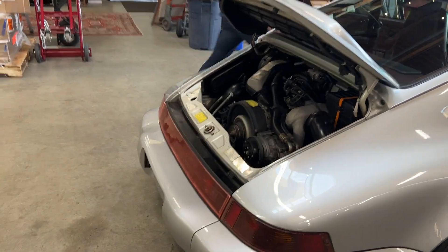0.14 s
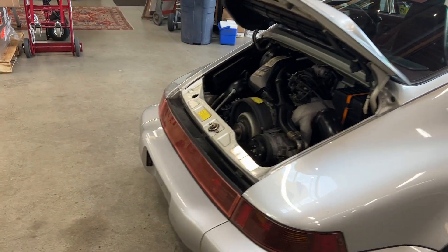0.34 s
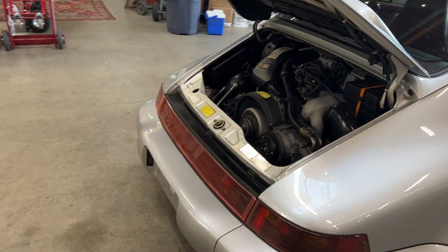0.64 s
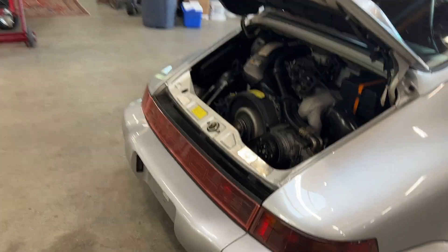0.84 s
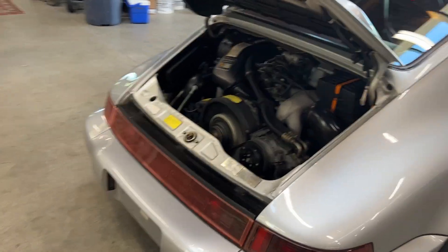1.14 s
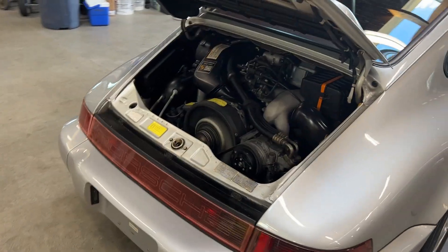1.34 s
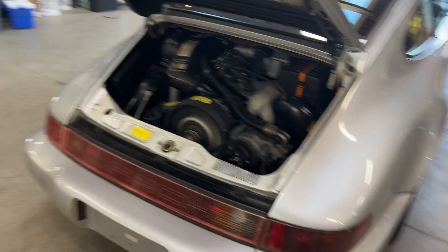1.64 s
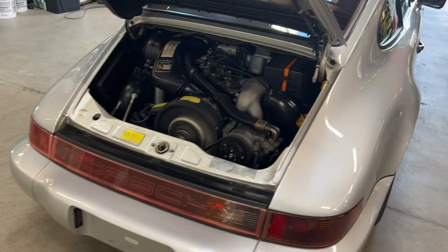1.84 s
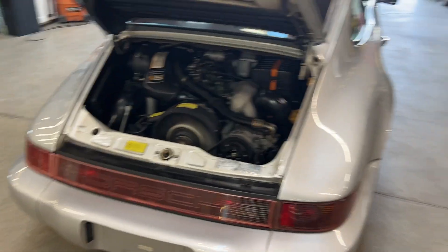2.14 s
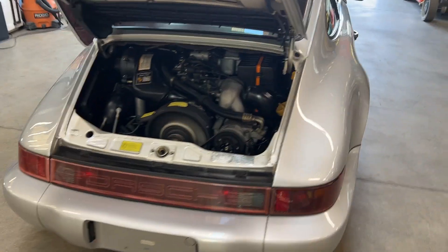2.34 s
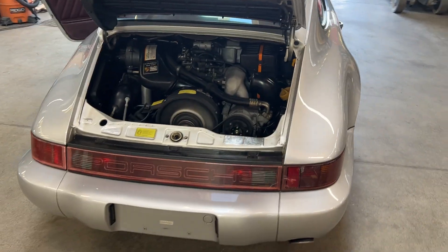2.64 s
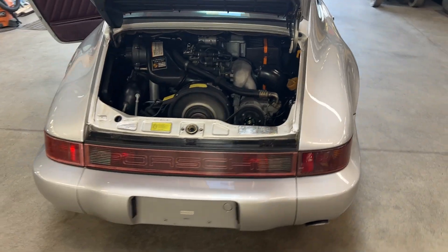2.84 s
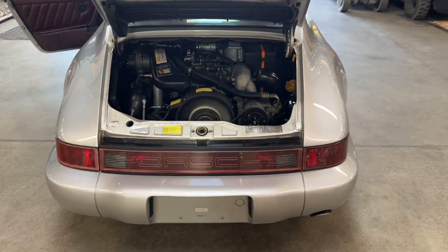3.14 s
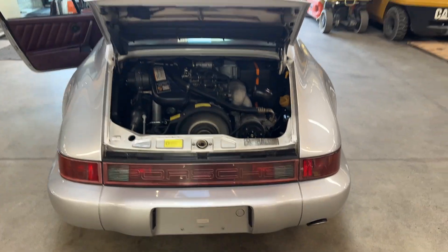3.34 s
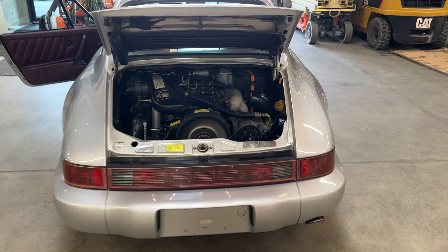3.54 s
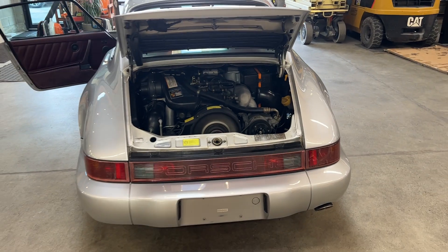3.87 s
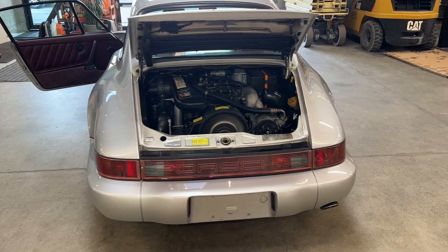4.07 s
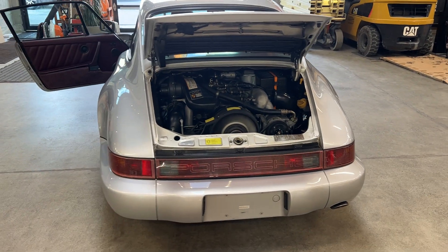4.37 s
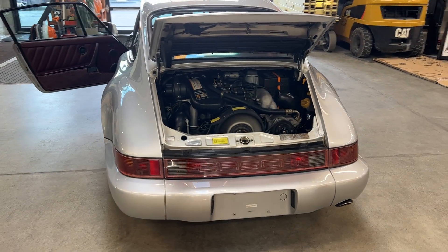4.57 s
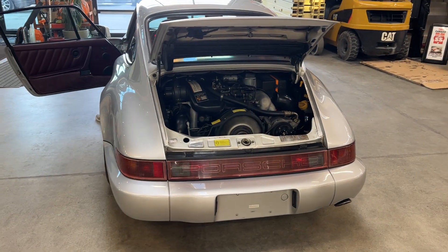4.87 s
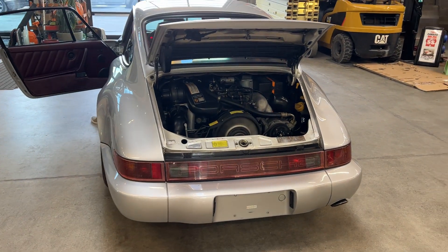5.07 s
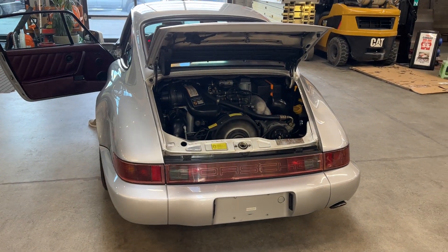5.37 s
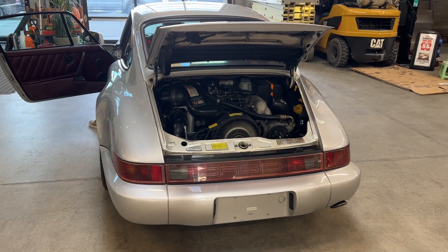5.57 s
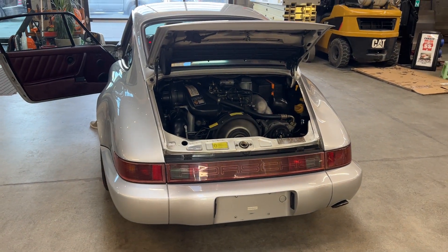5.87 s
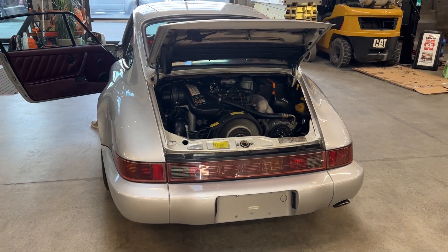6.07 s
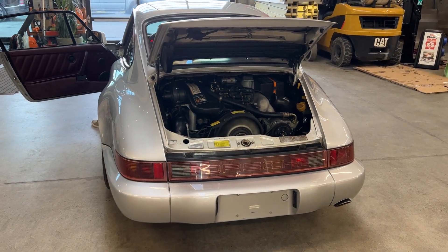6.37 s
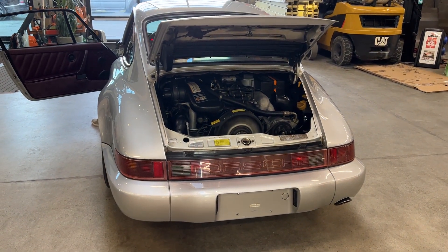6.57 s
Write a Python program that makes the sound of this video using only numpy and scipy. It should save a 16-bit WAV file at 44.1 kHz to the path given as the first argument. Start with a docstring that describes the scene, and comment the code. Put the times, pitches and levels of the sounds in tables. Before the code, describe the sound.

From 0 s an air-cooled six-cylinder engine is already idling at roughly 940 turns a minute, heard close in stereo with the lid open in a large workshop. Fast exhaust puffs, about 47 a second, fuse into a deep, uneven throb around 50-115 Hz with a hollow bark above. Cooling-fan roar and bright hiss cover it, leaning left especially around 0.7-1.5 s, with a light valve tick about eight times a second. A breathy whistle near 1.2 kHz wavers. Rough high whine swells around 1-2 s; small belt chirps flicker throughout. Near 2-3 s the exhaust faces the listener more directly and intake rush strengthens. From 3.7 s the deep boom recedes as the listener backs away. Between 4 and 6.4 s weak firings make the idle lumpier and the whistle sag repeatedly; squeaky chirps recur. It continues idling to the end at 6.7 s.

```python
"""The boom of exhaust puffs comes first, some of them weak: an air-cooled six-cylinder boxer engine idles in a
large workshop, its lid open, and the listener walks round the tail and backs off. Each puff strikes resonant
modes of the exhaust and silencer. Around them the cooling fan roars and hisses as shaped noise, one valve ticks
as a treble flare once a cycle, the intake whistles as a tone that sags in pitch over rushing noise,
and the belt drive chirps and whines as tones roughened by narrow noise."""
import sys
import numpy as np
from scipy import signal
from scipy.fft import rfft, irfft, next_fast_len
from scipy.io import wavfile

SR = 44100
rng = np.random.default_rng(int(sys.argv[2]) if len(sys.argv) > 2 else 0)


def volts(x):
    """Linear amplitude factor 10**(x/20) for a level x in dB, scalar or array-like."""
    e = np.asarray(x, float) / 20
    return 10 ** e


def store_wav(level_fs):
    """Save 16-bit WAV to argv[1]."""
    pcm = np.round(np.clip(np.atleast_2d(level_fs), -1, 1) * 32767)
    wavfile.write(sys.argv[1], SR, pcm.T.astype(np.int16))


N = 295894

# The idle hunts a little about a steady speed: start_s, crank_ahead_turns
CRANK_HUNTING = [(0, .112), (.5, .184), (.8, .198), (1.4, .343), (2, .294), (2.3, .252), (2.6, .172),
                 (3.2, .18), (3.5, .131), (3.8, .177), (4.7, .203), (5, .174), (5.6, .225), (6.2, .219),
                 (6.71, .141)]
# Cylinders in firing order, banks in turn: exhaust_opens_late_deg, puff_db
CYLINDERS = [(25.3, 5.8), (28.5, 0.2), (27.0, 1.0), (27.0, 6.1), (27.8, 6.1), (23.8, 1.5)]
# Firings that lose pressure: start_s, puff_lost_share, whistle_sag_hz
WEAK_FIRINGS = [(.438, 0.21, 31), (.544, 0.054, 24.5), (.65, 0.58, 29), (.863, 0.44, 20), (1.326, .05, 35),
                (1.582, .22, 80), (1.839, .24, 77), (2.07, .05, 50), (2.313, .16, 90), (2.465, .4, 18),
                (2.724, 0.43, 28), (3.215, 0.66, 30), (3.258, 0.19, 10), (3.75, .2, 10), (3.856, 0.39, 42),
                (3.92, 0.054, 75), (4.005, 0.5, 10), (4.261, 0.52, 127), (4.517, 0.56, 122),
                (4.645, .3, 10), (4.731, .55, 134), (4.795, .33, 30), (4.881, .35, 5), (4.903, .95, 65),
                (4.99, .05, 85), (5.137, 0.25, 30.3), (5.286, .95, 125), (5.478, .35, 39), (5.52, .44, 60),
                (5.563, .05, 60), (5.777, 0.47, 59), (5.798, 0.71, 79), (5.905, 0.35, 10),
                (6.033, 0.42, 40), (6.055, 0.74, 88), (6.161, .23, 5), (6.29, 0.051, 49), (6.441, .3, 10)]
# Exhaust and silencer modes, pushes signed: mode_hz, t60_s, first_bank_push, second_bank_push, thud_push
EXHAUST_MODES = [(50.59, 0.1, 2.85, 2.64, 2.09), (66.5, 0.25, -1.87, -1.86, 1.03),
                 (81.61, 0.12, -1.34, 1.71, 0.16), (101.04, 0.25, -0.48, -0.49, -0.83),
                 (112.19, 0.25, -1.04, -2.14, 0.54), (114.41, 0.25, 1.49, 2.29, -0.97),
                 (161.47, 0.17, -0.17, -0.56, -0.67), (174.84, 0.17, -0.74, 1.83, 0.82),
                 (178.65, 0.18, 0.92, -1.54, -0.34), (245.61, 0.19, 0.12, 0.01, 0.0)]
# Walking round and away: start_s, boom_level_db, facing_tailpipe_gain_db
NEARNESS = [(0, -12.5, -3), (.8, -12, -1), (1.4, -11.5, -.5), (2, -12.5, 3.5), (3.1, -13.5, 2),
            (3.7, -14, -.5), (4.3, -16, 1), (5.3, -16, -1.5), (6, -15.5, 0.5), (6.71, -17, 1.5)]

# Spectrum of the fan noise, relative: frequency_hz, density_db_per_hz
FAN_SPECTRUM = [(110, -17.5), (165, -14), (205, -11), (300, -15.5), (549, -27.5), (750, -24.5), (1000, -26),
                (1220, -22.5), (2000, -26.5), (3130, -32), (4070, -31.5), (5500, -33), (8030, -31.5),
                (10000, -39), (13000, -33.5), (15700, -39.5)]
# Likeness of the fan noise at left and right: frequency_hz, shared_share
FAN_LIKENESS = [(60, 0.9), (300, 0.95), (700, 0.57), (1200, 0.58), (2000, 0.56), (2700, 0.7), (3300, 0.35),
                (4200, 0.97), (5500, 0.05), (6500, 0.34), (8000, 0.46), (10000, 0.9), (15700, 0.9)]
# Centres that divide the fan noise into the roar (first) and five hiss bands: centre_hz
FAN_BANDS_HZ = [1000, 3000, 4500, 6000, 8000, 13000]
# Reference levels of the roar and the hiss bands: level_db
FAN_REFERENCE_DB = [-41, -43, -42.5, -44.5, -44, -47]
# Resting levels of the five hiss bands: level_db
HISS_REST_DB = [-42.5, -43.5, -44, -46.5, -49]
# The beamed hiss turns colour with the listener: centre_s, half_length_s, band_index (rounded), gain_db
COLOUR_TURNS = [(1.3, .8, 0, 2), (1.27, 0.35, 1.5, 1), (1.95, 0.55, 1, 3.5), (.8, .3, 1, 2),
                (3.2, .6, 2, 1.5), (.67, .35, 3, -4.5), (2.3, 1, 3, 3.5), (1.5, 1.2, 4.5, 1.7)]
# Side-to-side balance of the hiss near 6 kHz: start_s, left_over_right_db
HISS_BALANCE = [(0, 5), (.67, 12.5), (1.3, 12), (1.9, 5.5), (3.9, 4), (6.71, 2.5)]
# Reflections from floor, lid and engine bay: delay_ms
ECHOES_MS = [1.696, 2.9, 4.6, 7.3]

# Whistle pitch between sags: start_s, pitch_hz
WHISTLE_PITCH = [(0, 1228), (1.3, 1232), (1.6, 1261), (2.5, 1265), (3.8, 1268), (4.1, 1299), (6.14, 1300),
                 (6.2, 1215), (6.5, 1198), (6.71, 1195)]
# Air through the intake box, between dips: start_s, level_db
INTAKE_RUSH = [(0, -40.5), (1.3, -37), (3.1, -34.5), (3.85, -36), (4.3, -38.5), (5.2, -40), (6.71, -42)]

# Belt drive, alternator and fan bearing: pitch_hz, resting_db, roughness_ratio, width_hz, likeness_share
BELT_TONES = [(2152, -57.5, 1.1, 24, 0.38), (2690, -57, .6, 45, 0.3), (3380, -59, 4.8, 65, 0.57),
              (4026, -52, 4.8, 64, .6), (4435, -58, 4.8, 71, 0.54)]
# A belt-drive tone speaks up: centre_s, half_length_s, tone_index (rounded), gain_db
TONE_SWELLS = [(.58, .04, 1, 10), (.75, .03, 0, 13), (3.15, .6, 0.5, 4), (6.3, .5, 0, 3), (4.2, .8, 1, 4),
               (2.9, .1, 0, 11), (3.15, .1, 0, 7), (3.5, .18, 0, 8.5), (3.96, 0.028, 0, 11),
               (4.13, .1, 0, 14), (4.62, .05, 0, 14), (4.98, .08, -0.5, 11), (5.16, .04, 0, 17),
               (5.32, .03, 0.5, 15), (5.94, 0.051, 0, 18.5), (6.2, .06, 0, 18.5), (6.39, .04, 0, 7),
               (6.6, .07, 0, 17), (.27, .1, 1, 7), (1.0, .15, 1, 6), (1.74, .03, 1, 11),
               (2.04, .12, 1.5, 14), (2.43, .03, 1, 16), (2.68, .06, 1, 9), (3.39, .04, 1.5, 10),
               (3.66, 0.067, 1, 15), (3.83, 0.053, 1, 16.5), (3.97, .03, 1, 8), (4.14, .08, 1, 16),
               (4.31, 0.027, 1, 7), (4.44, 0.031, 1, 14), (4.62, .1, 1.5, 14), (4.88, 0.032, 1, 12),
               (4.96, .03, 1, 8), (5.09, 0.032, 1.5, 9), (5.97, 0.049, 1.5, 8), (6.49, .03, 0.5, 10),
               (.95, 0.39, 2, 11), (2.4, .15, 1.5, 7), (2.85, .15, 2.5, 8), (3.9, .5, 1.5, 7),
               (6.3, .5, 2.5, 4), (.15, .12, 3.5, 5), (1.25, .25, 3, 10), (2.15, .25, 3, 7),
               (5.1, .4, 3, 4), (2.85, .2, 3, 7), (1.4, .5, 3.5, 13), (4.6, .6, 4, 2)]

# Level difference between the two ports: frequency_hz, left_over_right_db
PORT_TILT = [(45, .4), (110, -.5), (380, -1), (1200, 0), (2700, -1.5), (4000, 4), (6500, 0), (8200, 3),
             (9200, 0)]
# Phase difference between the two ports: frequency_hz, left_lead_rad
PORT_LEAD = [(0, 0), (1500, .1), (2200, 1), (3800, 1), (5000, .5), (7000, .5), (8000, -.8), (9500, -3.1),
             (11000, -4), (13500, -6.3), (15700, -8.6)]

IDLE_TURNS_PER_S = 15.6
# Shares of a loss felt in the firing before and after, and made up one cycle later
LOSS_BEFORE, LOSS_AFTER, REBOUND = 0.27, 0.17, 0.26
THROB_DB, RASP_DB = -24.5, -30.3  # beamed middle and upper parts of the exhaust, before the facing gain
BARK_HZ, BARK_T60_S, BARK_DB = 243, 0.1, -36.5
BARK_SPREAD_DB, BARK_JITTER_S = 1.5, 0.0005
ROAR_DB, ROAR_FOLLOWS, BARK_FOLLOWS = -39.5, 0.13, 0.6  # shares of the boom's level changes, in dB
WHISTLE_DB, CLEAR_HZ, LOWEST_HZ = -38.5, 1205, 1165  # at full level up to CLEAR_HZ
FADE_DB_PER_HZ, RUSH_DIP_DB_PER_HZ = 0.13, 0.03  # whistle above CLEAR_HZ; rush per Hz of sag
SAG_LATE_S, SAG_HALF_S = 0.0149, 0.068
TONE_FLICKER_DB = 1.2


def rms_one(x):
    """Normalization: scales a signal to unit effective value."""
    return x / np.sqrt(np.mean(x ** 2) + 1e-20)


def in_time(rows):
    """Linear interpolation: each column after the first becomes a curve over time."""
    s, *columns = np.transpose(rows)
    return [np.interp(np.arange(N) / SR, s, column) for column in columns]


def at_hz(points, hz):
    """Interpolation on a logarithmic frequency axis."""
    knots, values = np.transpose(points)
    return np.interp(np.log(hz + 1), np.log(knots + 1), values)


def bump(s, half_s):
    """Gaussian envelope: a smooth swell of height 1."""
    return np.exp(-((np.arange(N) / SR - s) / half_s) ** 2)


def swells(rows, which):
    """Superposition in dB of the swells of one tone or band; an index halfway rounds to even."""
    return sum(db * bump(s, half_s) for s, half_s, k, db in rows if round(k) == which)


def drift(rate_hz):
    """Low-passed noise: slow chance variation of unit spread."""
    r = np.exp(-2 * np.pi * rate_hz / SR)
    noise = rng.standard_normal(N + SR)
    return rms_one(signal.lfilter([1], [1, -2 * r, r * r], noise)[SR:])


def ring(clicks, hz, t60):
    """Damped resonance: a unit click sets a decaying sine of height 1 ringing."""
    r, w = volts(-60 / (t60 * SR)), 2 * np.pi * hz / SR
    return signal.lfilter([0, np.sin(w)], [1, -2 * r * np.cos(w), r * r], clicks + 1e-18)


def wavering(hz, rough, width_hz):
    """Quadrature modulation: a tone with narrow noise around it."""
    phase = 2 * np.pi * np.cumsum(hz + np.zeros(N)) / SR
    noise = drift(width_hz) * np.sin(phase) + drift(width_hz) * np.cos(phase)
    return rms_one(np.sin(phase) + rough * noise)


def spread(make, alike):
    """Partial coherence: a shared sound plus a part each port hears alone (reflections off the walls)."""
    alike = np.clip(alike, 0, 1)
    return np.sqrt(alike) * make() + np.sqrt(1 - alike) * np.array([make(), make()])


def firing_times():
    """Crank kinematics: the crank's turns at known times, begun a second early so that modes already ring."""
    when, ahead = np.transpose(CRANK_HUNTING)
    turns = IDLE_TURNS_PER_S * when + ahead
    return np.r_[0, when + 1], np.r_[turns[0] - 15.74, turns] + 14


def puff_strengths(firing, when, turns):
    """Combustion variability: chance spread, with weak firings that also affect their neighbours."""
    strength = 1 + 0.083 * rng.standard_normal(len(firing))
    shares = np.array([LOSS_BEFORE, 1, LOSS_AFTER, -REBOUND])
    for s, loss, _ in WEAK_FIRINGS:
        k = int(round(3 * np.interp(s + 1, when, turns)))
        strength[[k - 1, k, k + 1, k + 6]] *= np.clip(1 - loss * shares, 0, 2)
    return strength


def exhaust_bark(puffs, at):
    """Coupled resonance: two equal resonators in series ring up after each puff of the first bank."""
    spread_db, jitter = rng.standard_normal((2, len(at)))
    barks = np.zeros(N + 2 * SR)
    late = (SR * BARK_JITTER_S * jitter).astype(int)
    barks[at + late] = puffs[at] ** 2 * volts(BARK_SPREAD_DB * spread_db)
    once = ring(barks[:N + SR], BARK_HZ, BARK_T60_S)
    return ring(once, BARK_HZ, BARK_T60_S)[SR:]


def exhaust(levels_db):
    """Modal excitation: puffs of each bank and one thud a cycle drive the silencer modes; the tailpipe barks."""
    when, turns = firing_times()
    firing = np.arange(int(3 * turns[-1]))  # three firings a turn
    strength = puff_strengths(firing, when, turns)
    late_deg, puff_db = np.transpose(CYLINDERS)[:, firing % 6]
    at = (SR * np.interp(firing / 3 + late_deg / 360, turns, when)).astype(int)
    thud_at = (SR * np.interp(firing[::6] / 3 + 472.6 / 360, turns, when)).astype(int)
    pushes = np.zeros((3, N + 2 * SR))  # first bank, second bank, thud
    pushes[firing % 2, at] = strength * volts(puff_db)
    pushes[2, thud_at] = 1
    boom = sum(ring(np.dot(push, pushes[:, :N + SR]), hz, t60) for hz, t60, *push in EXHAUST_MODES)
    # Little is heard below this corner
    boom = signal.sosfilt(signal.butter(4, 43.6, "high", fs=SR, output="sos"), boom)[SR:]
    size = next_fast_len(N)
    spectrum = rfft(boom, size)
    deep, lower = [irfft(spectrum[:round(hz * size / SR)], size)[:N] for hz in (88, 130)]
    bark = exhaust_bark(pushes[0], at[::2])
    parts = deep, lower - deep, boom - lower, bark  # the deep near field fades first with distance
    return sum(volts(db) * rms_one(part) for db, part in zip(levels_db, parts))


def once_a_cycle(turns, place, sharp):
    """Periodic pulse: a bump up to 1 at one place (0-1) of the two-turn cycle."""
    return np.exp(sharp * (np.cos(2 * np.pi * (turns / 2 - place)) - 1))


def add_reflections(pair):
    """Comb filtering: drifting short echoes of the treble put narrow streaks in the hiss."""
    lags = [(ms + 0.05 * drift(0.3)) * SR / 1000 for ms in ECHOES_MS]
    n = np.arange(N)
    echo = [sum(np.interp(n - lag, n, side) for lag in lags) for side in pair]
    # Only the treble is mirrored
    echo = signal.sosfilt(signal.butter(2, 2500, "high", fs=SR, output="sos"), echo)
    return pair + 0.2 * echo


def fan(turns, roar_db):
    """Turbulence noise in bands: the treble throbs with the firings and flares when the loose valve shuts."""
    size = next_fast_len(N)
    hz = np.arange(size // 2 + 1) * SR / size
    shared, left, right = rfft(rng.standard_normal((3, size))) * volts(at_hz(FAN_SPECTRUM, hz))
    alike = np.clip(at_hz(FAN_LIKENESS, hz), 0, 1)
    pair = np.sqrt(alike) * shared + np.sqrt(1 - alike) * np.array([left, right])
    firing_db = 0.59 * np.cos(2 * np.pi * (3 * turns - 0.3))
    valve_db = 2.0 * once_a_cycle(turns, 0.786, 30)
    throb_db = firing_db + valve_db + 0.15 * drift(21)
    throb_share = [0.07, 0.4, 0.028, 1, 1, 1]
    hiss_db = [db + swells(COLOUR_TURNS, k) for k, db in enumerate(HISS_REST_DB)]
    balance_db = in_time(HISS_BALANCE)[0] * [[0.5], [-0.5]]
    out = 0
    for k, level_db in enumerate([roar_db] + hiss_db):
        band = np.interp(np.log(hz + 1), np.log(FAN_BANDS_HZ), np.arange(6) == k)
        swing_db = level_db - FAN_REFERENCE_DB[k] + throb_share[k] * throb_db + 0.73 * drift(7.8)
        gain = volts(swing_db + (k == 3) * balance_db)  # only the 6 kHz band leans to a side
        out = out + gain * irfft(pair * band, size)[:, :N]
    # The level is set against the shared noise between 400 and 1000 Hz
    reference = np.std(irfft(shared * (hz > 400) * (hz < 1000), size))
    return volts(-41.5) * add_reflections(out) / reference


def intake():
    """Flow tone and resonant noise: the idle-air whistle sags and clears after weak firings as the rush dips."""
    sag_hz = sum(hz * bump(s + SAG_LATE_S, SAG_HALF_S) for s, _, hz in WEAK_FIRINGS)
    # Sags flatten out softly near the lowest pitch
    above_hz = in_time(WHISTLE_PITCH)[0] - sag_hz - LOWEST_HZ
    hz = LOWEST_HZ + 15 * np.logaddexp(0, above_hz / 15) + 6 * drift(9.03)
    # The whistle thins into the rush as it rises
    whistle_db = WHISTLE_DB - FADE_DB_PER_HZ * np.maximum(hz - CLEAR_HZ, 0)
    whistle = volts(whistle_db) * spread(lambda: wavering(hz, 0.66, 41), 0.67)
    rush_db = in_time(INTAKE_RUSH)[0] - RUSH_DIP_DB_PER_HZ * sag_hz
    rush = spread(lambda: rms_one(ring(rng.standard_normal(N), 1350, 0.015)), 0.79)
    return whistle + volts(rush_db) * rush


def belt_drive(turns):
    """Friction tones: two chirps pulse with the fan pulley beside three rough whines; belt slip sways all."""
    pulse_db = 3.6 * np.cos(2 * np.pi * (1.5 * turns - 0.3))
    slip = 1 + 0.0012 * drift(4)
    out = 0
    for k, (hz, db, rough, width_hz, alike) in enumerate(BELT_TONES):
        level_db = db + swells(TONE_SWELLS, k)
        if k < 2:
            level_db = level_db + pulse_db + TONE_FLICKER_DB * drift(6.8)
        out = out + volts(level_db) * spread(lambda: wavering(hz * slip, rough, width_hz), alike)
    return out


def scene():
    """Superposition: the exhaust reaches both sides alike, and the other sources are added to it."""
    turns = IDLE_TURNS_PER_S * np.arange(N) / SR + in_time(CRANK_HUNTING)[0]
    boom_db, facing_db = in_time(NEARNESS)
    boom_change_db = boom_db - boom_db.mean()
    bark_db = BARK_DB + BARK_FOLLOWS * boom_change_db
    roar_db = ROAR_DB + ROAR_FOLLOWS * boom_change_db
    puffs = exhaust([boom_db, THROB_DB + facing_db, RASP_DB + facing_db, bark_db])
    return puffs + fan(turns, roar_db) + intake() + belt_drive(turns)


def ports(x):
    """Interaural difference: two microphone ports hear a near source with their own tilt and lead."""
    size = next_fast_len(N)
    hz = np.arange(size // 2 + 1) * SR / size
    half = volts(at_hz(PORT_TILT, hz) / 2) * np.exp(0.5j * at_hz(PORT_LEAD, hz))
    return irfft(rfft(x, size) * [half, 1 / half], size)[:, :N]


def roll_off(x):
    """The treble ends steeply here."""
    return signal.sosfilt(signal.butter(12, 15700, fs=SR, output="sos"), x)


def record(dry):
    """Stereo reception: the ports colour the two sides."""
    mix = ports(dry)
    return roll_off(mix)


dry = scene()
out = record(dry)
store_wav(out)
```